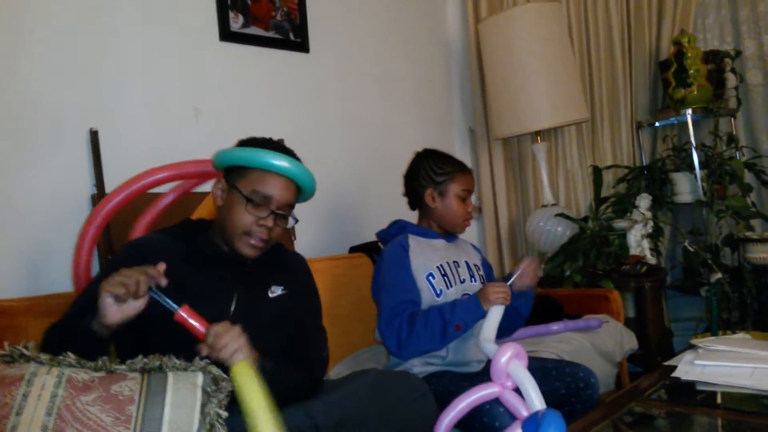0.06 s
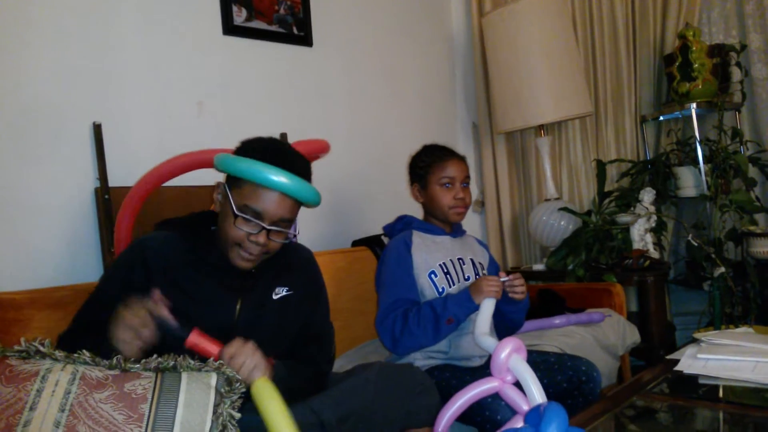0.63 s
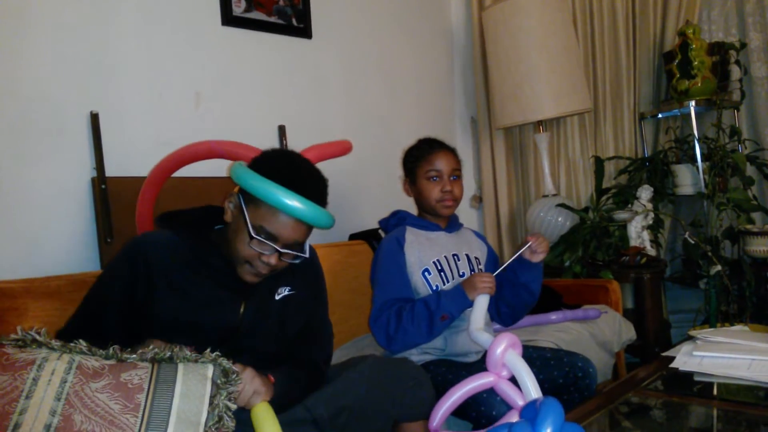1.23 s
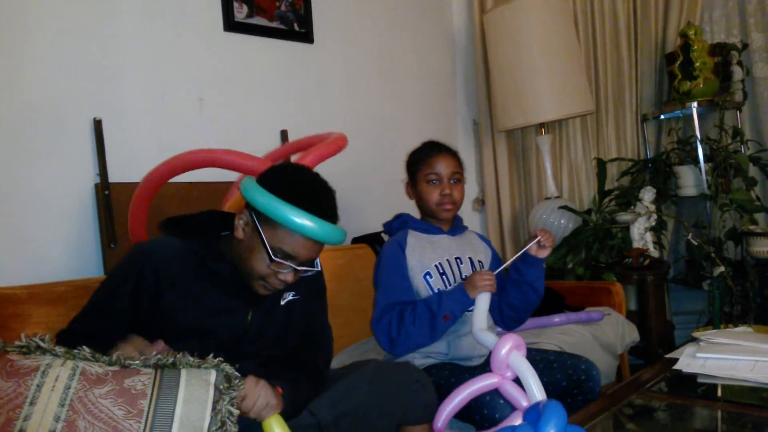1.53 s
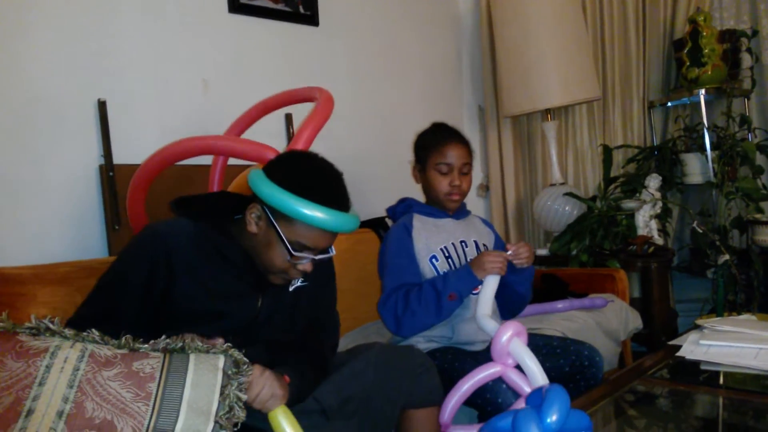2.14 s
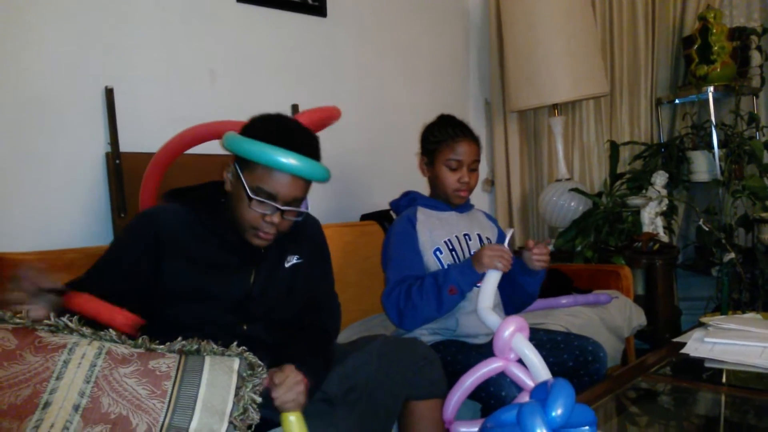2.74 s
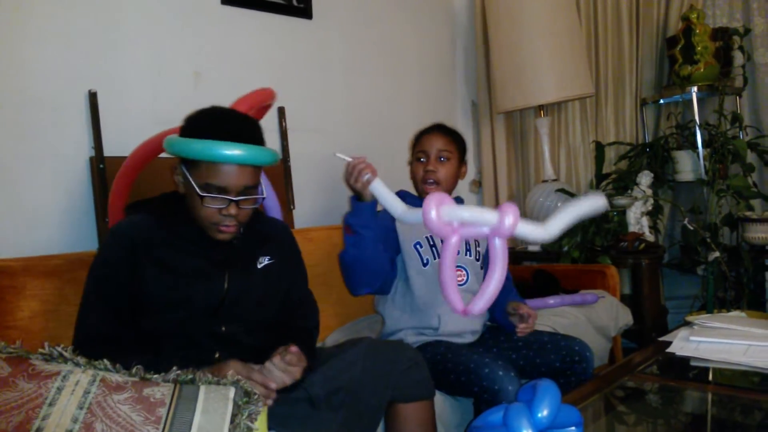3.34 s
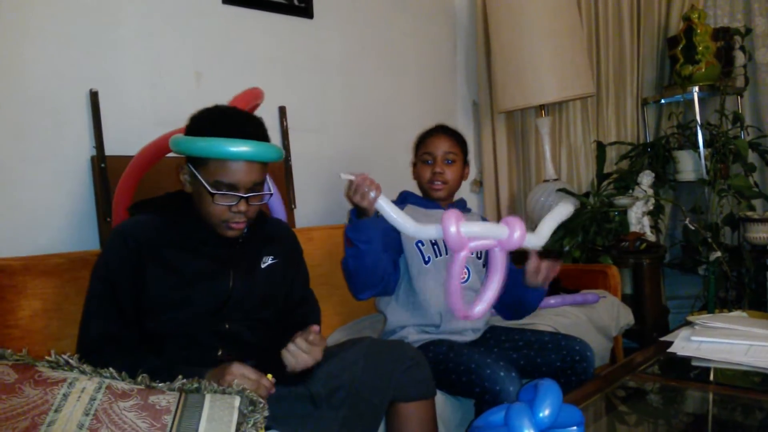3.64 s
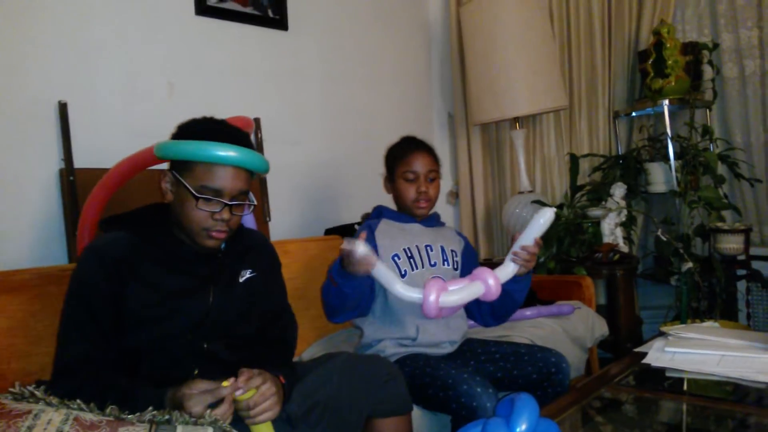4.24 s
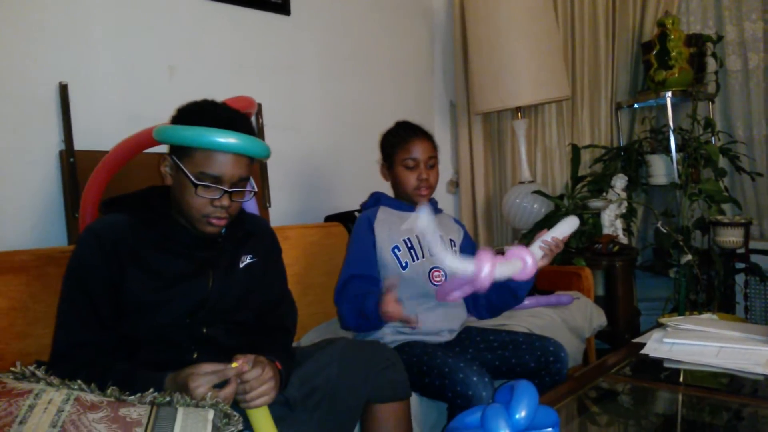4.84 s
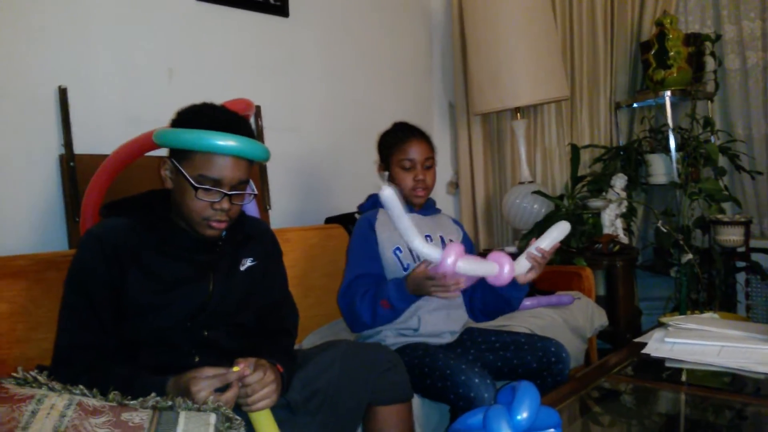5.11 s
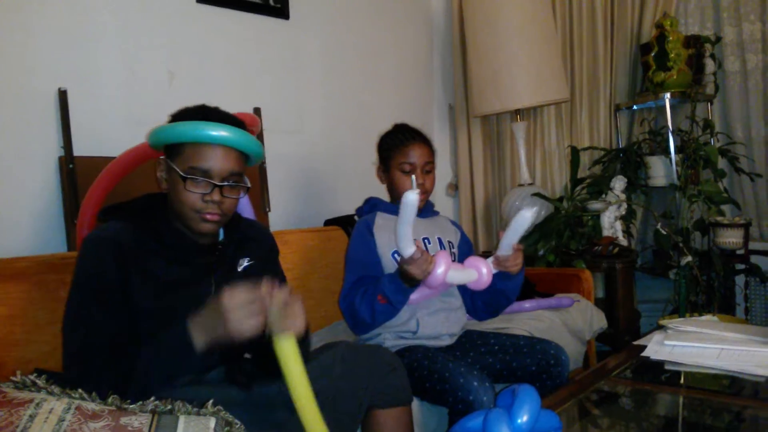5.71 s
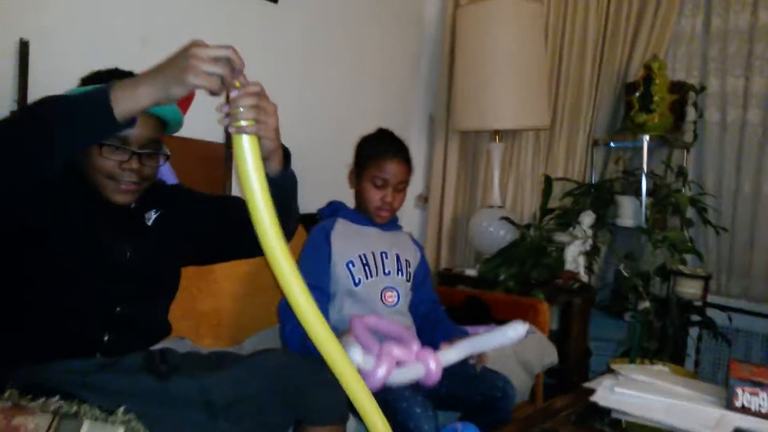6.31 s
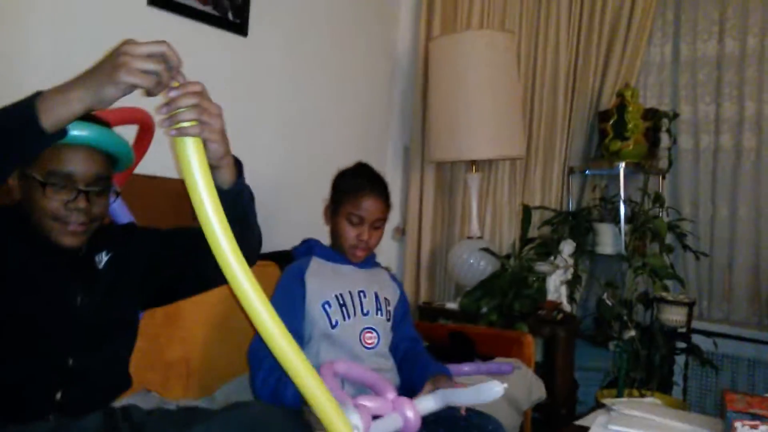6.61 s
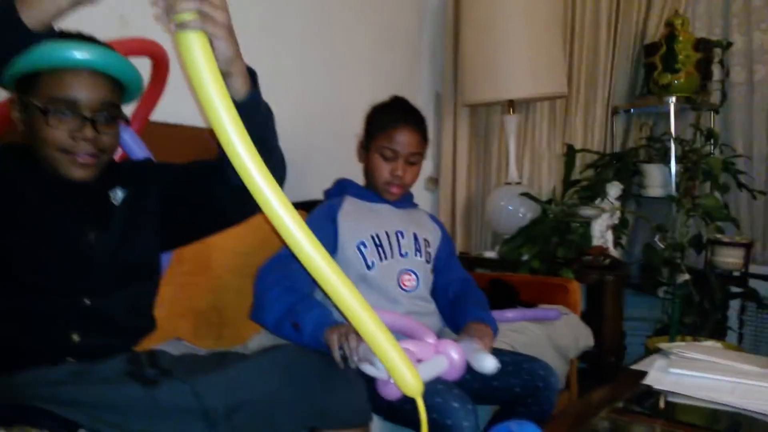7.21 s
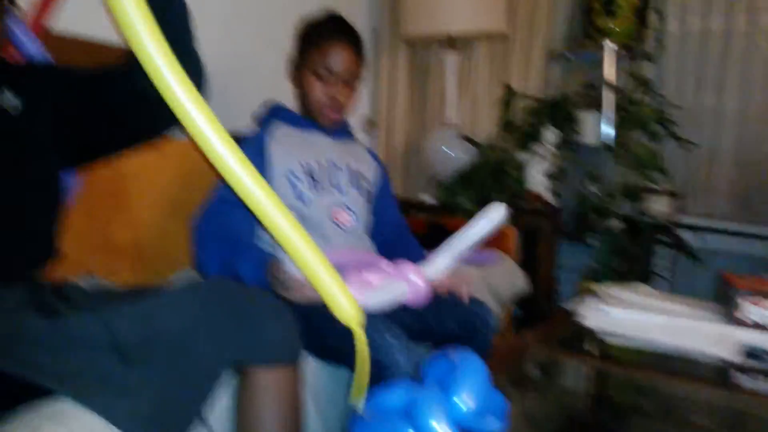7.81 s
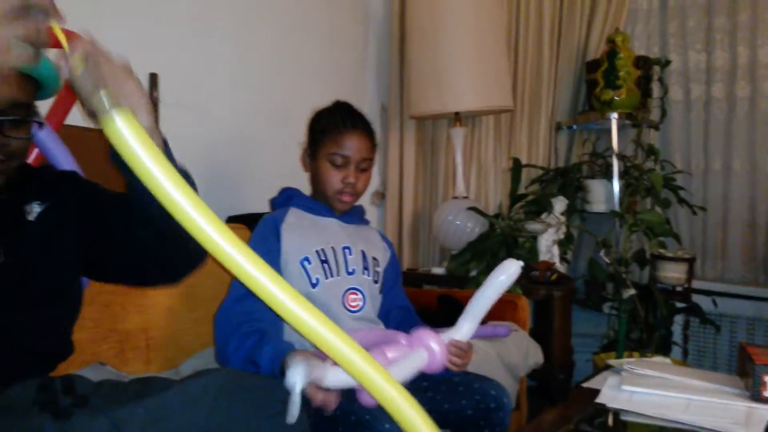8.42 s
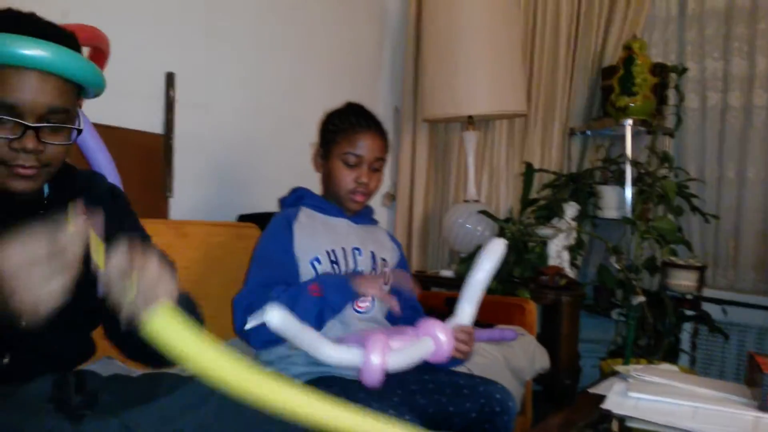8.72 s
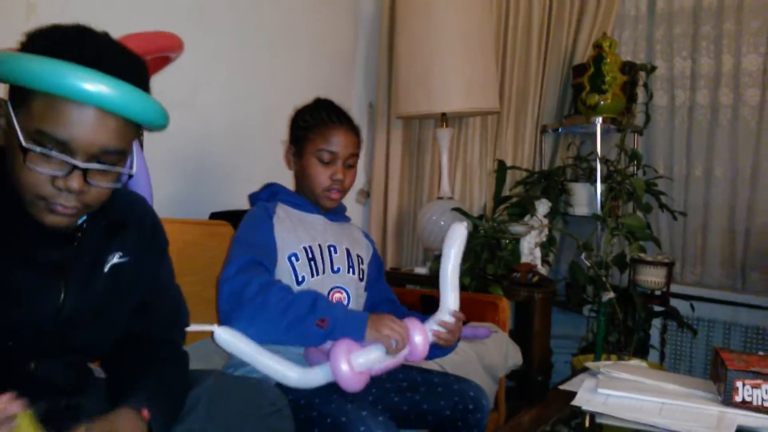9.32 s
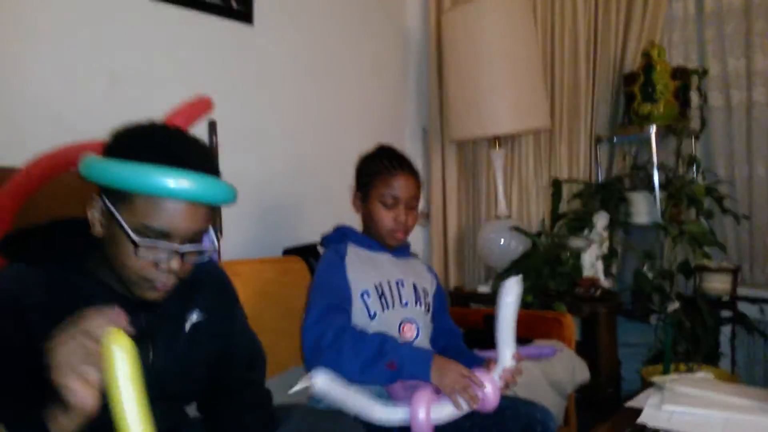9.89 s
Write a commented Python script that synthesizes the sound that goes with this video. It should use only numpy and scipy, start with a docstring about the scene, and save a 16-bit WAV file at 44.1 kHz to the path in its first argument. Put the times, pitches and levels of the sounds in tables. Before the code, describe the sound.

Quick whistling pump strokes inflate a long balloon, followed by leaking air and the scrapes, creaks and snaps of latex being tied.

```python
"""A long latex balloon is filled by a hand pump, let down a little and knotted, in a living room.
Each pump stroke hisses through a whistling valve, the seal squeaks and the piston clacks.
The balloon pops off the nozzle and is bumped, and air rushes, then seeps, through its neck.
Fingers stretch, twist and knot the rubber, which sticks and slips: it scrapes, snaps and briefly sings.
Behind it, cloth rustles on a sofa and the pump thuds against the sofa's arm."""
import sys
import numpy as np
from scipy import signal
from scipy.fft import rfft, irfft, next_fast_len
from scipy.io import wavfile
from scipy.ndimage import uniform_filter1d, map_coordinates

SR = 44100
rng = np.random.default_rng(int(sys.argv[2]) if len(sys.argv) > 2 else 0)


def dump(signal):
    """Clip the signal to [-1, 1] and save it as 16-bit WAV at the path in sys.argv[1]."""
    limited = np.clip(np.atleast_2d(signal).T, -1, 1)
    pcm = np.round(limited * 32767).astype(np.int16)
    wavfile.write(sys.argv[1], SR, pcm)


N = 438794
TIME = np.arange(N) / SR
FFT_SIZE = next_fast_len(N + SR, True) // 2 * 2
HZ = np.maximum(np.arange(FFT_SIZE // 2 + 1) * SR / FFT_SIZE, 1)

# Whistles of air forced through the balloon's neck: pitch_hz, level_db
NECK_WHISTLES = [(6330, -5), (7050, -5), (7500, -1), (7900, -8)]
# Air rushing from the open neck: time_s, level_db, whistle_boost_db
NECK_AIRFLOW = [(2.674, -84, -3), (2.685, -44, 11), (2.69, -24, 7.5), (2.722, -25.5, 2), (2.81, -38, 0.5),
                (3.098, -47, 3.5), (3.33, -35, 7), (3.434, -37, 6), (3.49, -34, 9.5), (3.6, -32, 10),
                (3.668, -30, 5), (3.738, -68, 8), (3.744, -76, 19), (3.77, -74, 3)]
# Hard rubs on the rubber, and at 2.69 s the neck fluttering as it comes off the nozzle: start_s, swell_s,
# fade_s, level_db, ring_hz, treble_db, slips_per_s, unevenness (0 to 1), low_cut_hz
HARD_RUBS = [(2.69, 0.0011, .0039, -19.5, 1900, 2, 1060, 0.55, 400),
             (2.848, .0036, .019, -45, 3080, 11, 630, 0.92, 400),
             (3.192, .003, .011, -33, 1450, 11, 376, 0.74, 400),
             (3.252, 0.0034, 0.029, -24.5, 970, 1.5, 535, 0.69, 150),
             (4.17, 0.039, .055, -39.5, 1620, 0.5, 850, 0.69, 300),
             (4.48, 0.016, 0.024, -40.5, 1140, -13, 700, 0.54, 400),
             (4.629, 0.046, 0.064, -29.5, 2860, -3.5, 570, 0.69, 250),
             (4.786, .008, 0.032, -35, 2210, -1, 630, 0.71, 400),
             (5.015, 0.027, 0.024, -37.5, 1810, 6, 1100, .8, 690),
             (5.15, 0.042, 0.075, -36.5, 2320, -6, 600, 0.77, 300),
             (5.83, 0.023, .05, -37.5, 6040, 4, 850, 0.61, 700),
             (5.89, 0.043, 0.046, -26, 5400, 5, 590, 0.39, 900),
             (5.94, 0.016, .025, -25, 2400, -2, 410, .15, 600),
             (5.97, 0.029, 0.013, -28, 2200, 3.5, 450, 0.05, 350),
             (6.015, 0.013, 0.021, -19, 3900, -4, 490, .1, 900),
             (6.616, 0.0059, 0.044, -30.5, 8400, 5, 1000, 0.69, 1500),
             (6.635, 0.022, 0.021, -24.5, 3700, -11, 450, .2, 300),
             (6.716, 0.032, 0.027, -27.5, 2400, 0, 640, 0.27, 300),
             (6.79, .02, 0.013, -33.5, 750, -17, 400, .3, 300),
             (6.89, .014, 0.033, -26, 1420, -1, 1240, 0.24, 1150),
             (6.965, 0.025, .014, -29, 1120, -7, 750, .3, 650),
             (7.12, 0.024, 0.054, -35.5, 2100, 3.5, 650, 0.56, 400),
             (7.493, .003, 0.026, -22.5, 4380, -14, 200, 0.34, 3000),
             (7.581, 0.0034, 0.019, -23.5, 2120, -1.5, 440, .2, 500),
             (7.648, 0.0052, .014, -27.5, 4130, -5, 520, 0.31, 400),
             (7.706, 0.031, .022, -27, 3360, 4, 380, 0.07, 350),
             (7.812, 0.013, 0.02, -20.5, 6000, -1, 440, 0.11, 350),
             (7.893, 0.006, 0.034, -19, 2540, 0, 370, .08, 300),
             (7.894, 0.0095, 0.016, -18.5, 5600, -0.5, 390, 0.07, 1500),
             (8.905, .012, 0.048, -32.5, 990, 3.5, 660, .7, 350),
             (8.95, 0.059, 0.041, -31.5, 1800, -7, 650, .5, 300),
             (9.085, 0.062, 0.038, -26, 1430, 0.5, 470, 0.28, 300),
             (9.345, 0.015, 0.048, -28, 3950, 3, 870, 0.47, 2200),
             (9.452, 0.0033, 0.011, -21.5, 3930, -1, 1240, 0.58, 1200),
             (9.54, 0.013, .014, -34.5, 4130, 1, 630, 0.6, 800)]


def from_db(db):
    """Turn decibels into a number to multiply by."""
    return 10 ** (np.asarray(db) / 20)


def rms_one(x):
    """Scale a signal to an average power of 1."""
    return x / np.sqrt(np.mean(x ** 2) + 1e-20)


def at_hz(points):
    """Spread a short table of (pitch_hz, value) over all frequencies."""
    hz, value = np.transpose(points)
    return np.interp(np.log(HZ), np.log(hz), value)


def gains(rows):
    """One gain curve for each decibel column of a timed table, silent outside its span."""
    times, *columns = np.transpose(rows)
    inside = (TIME >= times[0]) & (TIME <= times[-1])
    return [from_db(np.interp(TIME, times, db)) * inside for db in columns]


def drift(per_s):
    """A random wander of about plus or minus 1, with per_s new values a second."""
    points = rng.standard_normal(8000)
    return rms_one(np.interp(TIME * per_s, np.arange(len(points)), points))


def colour(x, spectrum):
    """Filter to a tone colour, keeping the power of white noise."""
    cepstrum = irfft(np.log(rms_one(from_db(at_hz(spectrum)))))
    # Folding it makes the filter ring only after a sound, never before.
    cepstrum[1:FFT_SIZE // 2] *= 2
    cepstrum[FFT_SIZE // 2 + 1:] = 0
    return irfft(rfft(x, FFT_SIZE) * np.exp(rfft(cepstrum)))[..., :N]


def high_pass(x, hz, order):
    """Weaken everything below hz."""
    return signal.sosfilt(signal.butter(order, hz, "high", fs=SR, output="sos"), x + 1e-18)


def resonate(x, hz, q):
    """Ring at one pitch, keeping the power of white noise; a higher q rings longer."""
    decay, angle = np.exp(-np.pi * hz / (q * SR)), 2 * np.pi * hz / SR
    feed = np.sqrt((1 - decay ** 2) / 2) * np.array([1, 0, -1])
    return signal.lfilter(feed, [1, -2 * decay * np.cos(angle), decay ** 2], x + 1e-18)


def diffuse(pair):
    """Blend two unrelated signals into left and right, alike in the bass."""
    # How alike the two sides are: pitch_hz, likeness (0 to 1)
    likeness = [(30, 0.7), (120, 0.85), (300, 0.8), (650, 0.66), (1400, 0.1), (4000, 0.1), (14000, 0)]
    alike = at_hz(likeness)
    mid, side = rfft(pair, FFT_SIZE)
    return irfft(np.sqrt((1 + alike) / 2) * mid + np.sqrt((1 - alike) / 2) * side * [[1], [-1]])[:, :N]


def noise():
    """White stereo noise."""
    return diffuse(rng.standard_normal((2, N)))


def clicks_at(rows):
    """One click for each row of (start_s, level_db)."""
    out = np.zeros(N)
    for start_s, db in rows:
        out[int(start_s * SR)] += from_db(db)
    return out


def fading(clicks, fade_s):
    """Give each click a fading level curve of the same energy."""
    decay = np.exp(-2 / (fade_s * SR))
    return np.sqrt(signal.lfilter([1 - decay], [1, -decay], clicks ** 2 + 1e-18))


def noise_bursts(clicks, fade_s):
    """Each click leaves a short burst of noise, like many crowded tones dying away."""
    return fading(clicks, fade_s) * noise()


def swell_and_fade(t, swell_s, fade_from_s, fade_s):
    """A level that rises in a straight line, holds, then dies away."""
    return np.clip(t / swell_s, 0, 1) * np.exp(-np.clip((t - fade_from_s) / fade_s, 0, 50))


def slips(per_s, uneven, spread_db, count=N):
    """Sticking and slipping: a train of clicks with uneven gaps and strengths."""
    gap_luck, size_luck = rng.standard_normal((count // 20, 2)).T
    at = np.cumsum(SR / per_s * np.exp(uneven * gap_luck)).astype(int)
    out = np.zeros(count)
    out[at[at < count]] = from_db(spread_db * np.clip(size_luck[at < count], -2, 2))
    return rms_one(out)


def squeaks(rows, waver, rough_db, even_db):
    """Short gliding tones of rubber slipping almost regularly; even_db weakens the even overtones."""
    out = np.zeros(N)
    wobble = 1 + waver * drift(250)
    grip = from_db(rough_db * np.tanh(drift(300)))
    for middle_s, hz, db, half_s, glide, overtone_db in rows:
        near = np.abs(TIME - middle_s) < 3 * half_s
        t = TIME[near] - middle_s
        phase = 2 * np.pi * np.cumsum(hz * 2 ** (glide * t) * wobble[near]) / SR
        tone = np.sin(phase)
        for k in range(2, 7):
            tone += from_db(overtone_db + even_db * (k % 2 == 0)) * np.sin(k * phase) * 2 / k
        out[near] += np.sqrt(2) * from_db(db) * np.exp(-(t / half_s) ** 2) * tone
    return out * grip


def room_tone():
    """The faint, steady rumble and hiss of a quiet room."""
    # Its tone colour: pitch_hz, level_db
    room_colour = [(15, -56), (25, 0), (54, -14), (157, -41.5), (679, -19), (1970, -9), (2500, -6.5),
                   (5410, -5.5), (7450, -4.5), (9730, -9), (14500, -13)]
    return from_db(-51.5) * colour(noise(), room_colour)


def room_echo(x, ring_s=0.2, delay_s=.004):
    """Crowded reflections of a furnished room, falling 60 dB in ring_s."""
    t = TIME[:SR // 2]
    tail = rng.standard_normal((2, len(t))) * from_db(-60 * t / ring_s) * (t > delay_s)
    tail /= np.sqrt(np.sum(tail ** 2, axis=1, keepdims=True))
    return diffuse(signal.fftconvolve(x, tail, axes=1)[:, :N])


def cloth_rustle():
    """Cloth rustles in soft lumps as people move on a sofa."""
    # How much they move: time_s, level_db
    movement = [(0.0, -58.5), (1.3, -66), (2.19, -63), (2.8, -73.5), (3.21, -50.5), (3.45, -40),
                (3.62, -72.5), (4.2, -60), (4.75, -82), (5.25, -65), (5.65, -69.5), (6.45, -63),
                (6.78, -53.5), (7.3, -61.5), (7.85, -56), (8.5, -61), (9.15, -45), (9.4, -56.5),
                (9.95, -59.5)]
    # Tone colour of cloth: pitch_hz, level_db
    cloth_colour = [(30, -33), (60, -20), (100, -3), (160, -1), (240, -1.5), (400, -4), (800, -7),
                    (2000, -39)]
    lumps = from_db(4.5 + 5 * np.tanh(drift(22)))
    return gains(movement)[0] * lumps * colour(noise(), cloth_colour)


def sofa_thuds():
    """The pump knocks on the sofa's padded arm, which rings low and dull."""
    # The knocks: start_s, level_db
    knocks = [(1.204, -42), (1.262, -41), (1.444, -46), (1.678, -28.5), (1.697, -35), (1.725, -41)]
    # Tones the arm rings with: pitch_hz, level_db, ring_s (time to fall 60 dB)
    sofa_tones = [(109, -11, 0.21), (146, -2.5, 0.13), (175, -4.5, .11), (290, -3, 0.071)]
    out, t = np.zeros(N), TIME[:SR // 3]
    soft_start = np.minimum(t / .004, 1)
    for start_s, db in knocks:
        at = int(start_s * SR)
        for hz, tone_db, ring_s in sofa_tones:
            level = soft_start * from_db(db + tone_db - 60 * t / ring_s)
            out[at:at + len(t)] += level * np.sin(2 * np.pi * (hz * t + rng.random()))
    return out


def strokes(rows, blur_hz=370, sag_octaves=0.053):
    """The air flow of pump strokes, and the valve's breathy whistle, which sags as the flow dies."""
    flow, whistle = np.zeros(N), np.zeros((2, N))
    slow = signal.butter(2, blur_hz, fs=SR, output="sos")
    breath = rms_one(signal.sosfilt(slow, rng.standard_normal((2, 2, N))))
    for middle_s, half_s, db, hz in rows:
        near = np.abs(TIME - middle_s) < 3 * half_s
        t = TIME[near] - middle_s
        width_s = half_s * (1 + 0.073 * np.sign(t))   # builds up faster than it dies
        effort = np.exp(-np.abs(t / width_s) ** 2.4)   # a slightly square bell curve
        phase = 2 * np.pi * np.cumsum(hz * 2 ** (sag_octaves * (effort - 1))) / SR
        tone = breath[0][:, near] * np.cos(phase) + breath[1][:, near] * np.sin(phase)
        flow[near] += from_db(db) * effort
        whistle[:, near] += from_db(db - 2) * effort * tone
    return flow, whistle


def pump_air():
    """Air hisses and whistles through valve and neck; the fluttering flap makes each push rasp."""
    # Pushes, about four a second: middle_s, half_length_s, level_db, whistle_hz
    pushes = [(.025, 0.033, -31.5, 6930), (.287, 0.039, -32, 6770), (.56, 0.037, -30, 7500),
              (.808, 0.038, -32, 7400), (1.067, 0.038, -34, 7300), (1.306, 0.035, -30, 7630),
              (1.539, 0.048, -33, 6900), (1.783, 0.036, -33.5, 6950), (2.016, 0.034, -33.5, 6570),
              (2.243, 0.028, -32.5, 6980)]
    # Softer pulls in between: middle_s, half_length_s, level_db, whistle_hz
    pulls = [(.18, 0.066, -47.5, 7300), (.428, 0.041, -34.5, 7400), (.678, 0.043, -33, 7250),
             (.928, 0.035, -34, 7270), (1.185, 0.046, -35, 7400), (1.42, 0.045, -35.5, 7130),
             (1.662, 0.044, -34, 7100), (1.912, 0.036, -35.5, 7150), (2.143, 0.041, -36.5, 7300),
             (2.43, 0.051, -42, 7420)]
    # Tone colour of the valve's hiss: pitch_hz, level_db
    valve_colour = [(60, -23), (200, -33), (500, -20), (900, -13.5), (1800, -17.5), (3000, -7), (4000, -9),
                    (5200, -6.5), (6300, -0.5), (7400, 1.5), (8500, -5), (10000, -8.5), (11500, -7),
                    (14500, -13)]
    # Tone colour of the fine spray of air on a push: pitch_hz, level_db
    spray_colour = [(3000, -30), (8500, -20), (11300, 1), (14500, -2)]
    push, push_whistle = strokes(pushes)
    pull, pull_whistle = strokes(pulls)
    flutter = fading(slips(per_s=260, uneven=.4, spread_db=3), fade_s=.0008)
    stream = push * (from_db(-4) + from_db(-8) * flutter) + pull
    hiss = colour(stream * from_db(0.5 + 0.94 * drift(400)) * noise(), valve_colour)
    neck = sum(resonate((push + pull) * from_db(db - 5 + 2 * drift(11)) * noise(), hz, q=25)
               for hz, db in NECK_WHISTLES)
    spray = colour(from_db(-3.5) * push * noise(), spray_colour)
    return hiss + spray + push_whistle + pull_whistle + neck


def valve_ticks():
    """The valve's flap ticks with a short, high ring."""
    # The ticks: start_s, level_db
    ticks = [(0.2885, -27), (0.776, -21), (0.786, -7.5), (0.7954, -13), (0.8084, -11), (1.045, -8),
             (1.067, -11), (1.3593, -16.5), (1.5606, -12.5)]
    return from_db(13) * resonate(noise_bursts(clicks_at(ticks), fade_s=0.0038), hz=7360, q=20)


def piston_seal():
    """The seal breaks loose with a dull tick and squeaks as it slides; uneven grip adds a rasp."""
    # Squeaks: middle_s, pitch_hz, level_db, half_length_s, glide_octaves_per_s, overtones_db
    chirps = [(.095, 950, -38.5, 0.021, 15.5, -10), (.345, 295, -46, 0.029, -1, -8.5),
              (.422, 960, -45.5, 0.021, 21, 0), (.507, 1313, -48, .01, -24.5, 0),
              (.617, 1084, -47, 0.0066, 25, -3), (.762, 1390, -49, 0.0082, 19, -12),
              (.925, 1067, -49, 0.026, 20.5, -12), (1.095, 730, -52, 0.024, -8, -17),
              (1.125, 1033, -47, .006, 26, -14), (1.162, 905, -50, 0.012, 19, -6),
              (1.37, 803, -46.5, .016, 19, -4), (1.635, 698, -43.5, 0.018, 13.5, -15),
              (1.89, 785, -47.5, 0.031, 13.5, -6), (2.11, 763, -47, 0.026, 12.5, -5),
              (2.365, 748, -53, 0.014, 6.5, -4)]
    # The seal breaking loose: start_s, level_db
    releases = [(.612, -32), (.9, -28), (1.122, -29), (1.871, -25), (2.095, -27), (2.356, -31.5)]
    tone = squeaks(chirps, waver=.09, rough_db=4, even_db=-4)
    rasp = from_db(-2.5)
    squeak = tone * (1 + rasp * drift(450)) / np.hypot(1, rasp)
    tick = resonate(noise_bursts(clicks_at(releases), fade_s=.003), hz=780, q=2.5)
    return from_db(-1) * squeak + from_db(7) * tick


def piston_clacks(rebound_s=0.016, turn_s=.057):
    """The piston hits its stop, rebounds and rattles, ringing the barrel at a new pitch each time."""
    # The hits: start_s, level_db, ring_hz
    hits = [(0.4517, -14.5, 5360), (0.6948, -13, 6940), (0.9495, -14, 6500), (1.199, -12.5, 5630),
            (1.44, -11.5, 7400), (1.691, -15, 7500)]
    # Tone colour of the pump's barrel: pitch_hz, level_db
    barrel_colour = [(60, -12), (200, -9.5), (900, -8), (2200, -4.5), (3500, 0), (5500, 6), (7300, 9),
                     (9000, -7), (14500, -27)]
    out, t = np.zeros((2, N)), TIME[:SR // 8]
    impact = from_db(3.5) * np.exp(-t / 0.0021)
    rattle = from_db(-8) * np.exp(-t / 0.023)
    rebound = from_db(-9) * np.exp(-((t - rebound_s) / 0.0039) ** 2)
    force = impact + rattle + rebound
    force += from_db(-12) * np.interp(t - turn_s, t, force, left=0)   # a light knock as the hand turns
    for start_s, db, hz in hits:
        at = int(start_s * SR)
        hit = from_db(db) * force * rng.standard_normal((2, len(t)))
        out[:, at:at + len(t)] += from_db(-7) * hit + from_db(-20) * resonate(hit, hz, q=7.7)
    return colour(out, barrel_colour)


def neck_pop(start_s=2.691):
    """A short puff rings the neck as it comes free of the nozzle."""
    puff = swell_and_fade(TIME - start_s, swell_s=0.0024, fade_from_s=0.0023, fade_s=0.013)
    return resonate(from_db(-27) * puff * noise(), hz=750, q=8.1)


def neck_echo(x, notch_spacing_hz=1050, echo_share=0.39):
    """A dull, upside-down echo from the neck's end hollows the sound; the neck's length wavers."""
    lag = SR / notch_spacing_hz * (1 + .04 * drift(8))
    dull = signal.sosfiltfilt(signal.butter(2, 3800, fs=SR, output="sos"), x + 1e-18)
    at = np.arange(N)
    return x - echo_share * np.array([np.interp(at - lag, at, side) for side in dull])


def escaping_air():
    """Air rushing from the open neck roars and whistles."""
    # Tone colour of the jet: pitch_hz, level_db
    jet_colour = [(1200, -54), (2500, -10.5), (3400, -14.5), (4000, -8.5), (5500, -2), (6300, 0.5),
                  (8000, -1.5), (9700, -7.5), (11800, -7), (14000, -5), (14600, -12.5)]
    # Tone colour of the lower rush: pitch_hz, level_db
    rush_colour = [(60, -43), (300, -30), (700, -51), (1100, -5), (2200, 6), (3500, -7), (6000, -11)]
    flow, whistle_boost = gains(NECK_AIRFLOW)
    drive = flow * whistle_boost ** 1.36
    whistle = sum(resonate(drive * from_db(db - 3 + 2.7 * drift(13)) * noise(), hz, q=35)
                  for hz, db in NECK_WHISTLES)
    jet = colour(flow * from_db(9.5 + 0.91 * drift(200)) * noise(), jet_colour)
    rush = from_db(-9.5) * colour(flow * noise(), rush_colour)
    return neck_echo(jet + rush) + whistle


def seeping_air():
    """Pinched to a slit, the neck gives a thin, high hiss."""
    # A short leak and a long one, each a list of: time_s, level_db
    leaks = [
        [(4.425, -61), (4.437, -31), (4.46, -28.5), (4.5, -45), (4.56, -74)],
        [(4.605, -62), (4.622, -33.5), (5.0, -33.5), (5.25, -34.5), (5.4, -38), (5.53, -45.5), (5.7, -38.5),
         (5.88, -43), (6.1, -50), (6.6, -49)],
    ]
    # Tone colour of the slit: pitch_hz, level_db
    slit_colour = [(1000, -65), (4000, -17.5), (6000, -6), (7500, 1), (9500, -6), (11500, -5.5), (13000, 4),
                   (14500, -0.5)]
    flow = sum(gains(leak)[0] for leak in leaks)
    return colour(flow * from_db(4.5 + 0.99 * drift(66)) * noise(), slit_colour)


def air_column(clamp_s=3.655):
    """The flow rings the air inside the neck, hardest as the fingers clamp it shut."""
    # Tones of that air: pitch_hz, level_db
    column_tones = [(1510, -12.5), (1900, -15), (2540, -12), (2840, -6), (3330, -15), (3980, -0.5),
                    (5000, -0.5), (5510, -12)]
    flow = gains(NECK_AIRFLOW)[0]
    stream = from_db(-44) * (flow / from_db(-31.5)) ** 0.39   # swings less than the flow does
    clamp = from_db(-26) * swell_and_fade(TIME - clamp_s, 0.0024, fade_from_s=0.011, fade_s=0.0091)
    return sum(resonate((stream + clamp) * from_db(db) * rng.standard_normal((2, N)), hz, q=24)
               for hz, db in column_tones)


def balloon_bumps():
    """Blows ring the balloon: a soft one stirs its low tones, a sharp slap mostly the higher ones."""
    # The blows: start_s, level_db, brightness_hz
    blows = [(2.613, -19, 202), (2.883, -24, 200), (3.093, -21, 230), (3.192, -31.5, 900),
             (3.253, -9, 1240), (3.266, -14.5, 1400), (3.285, -17, 1800), (3.394, -5.5, 300),
             (3.464, -13, 510), (8.192, -25.5, 400), (8.653, -10, 358), (8.702, -16, 220), (8.72, -24, 200),
             (8.878, -32.5, 700), (9.16, -18.5, 400), (9.667, -23.5, 290)]
    # Tones the balloon rings with: pitch_hz, level_db, ring_s (time to fall 60 dB)
    balloon_tones = [(155.6, -17, 0.093), (207, -9, 0.059), (263, -13, 0.1), (340, -9.5, 0.078),
                     (423, -3, 0.052), (460, -4.5, 0.031), (601, -1.5, 0.036), (839, -5, 0.058),
                     (916, -2.5, .06), (1040, -4, 0.071), (1730, -2, 0.036)]
    out, t = np.zeros(N), TIME[:SR // 4]
    for start_s, db, bright_hz in blows:
        at = int(start_s * SR)
        for hz, tone_db, ring_s in balloon_tones:
            # Where the blow lands changes each tone's share; the grip changes its tuning.
            place_db, tuning, sign = rng.normal(0, 1.5), rng.normal(1, .015), rng.choice([-1, 1])
            strength = sign * from_db(db + tone_db + place_db)
            strength /= (1 + (hz / bright_hz) ** 2) ** 1.34   # weakens tones above the brightness
            strength /= 1 + (0.14 * bright_hz / hz) ** 2   # and those far below it
            ring = from_db(-60 * t / ring_s) * np.sin(2 * np.pi * hz * tuning * t)
            out[at:at + len(t)] += strength * ring
    return high_pass(out, hz=135, order=4)   # a slim tube gives off no deep bass


def finger_pressure(spread_s=0.13):
    """How hard the rubber is pressed and shaken: a slow base, rising around every hard rub and the neck's
    flutter."""
    # Two spells of light touch, each a list of: time_s, level_db
    touches = [
        [(3.8, -73), (3.982, -54.5), (4.142, -47), (4.292, -55), (4.47, -45.5), (4.6, -79)],
        [(5.55, -57), (5.65, -50.5), (6.01, -33), (6.33, -49.5), (6.61, -48), (6.81, -42.5), (7.28, -56),
         (7.47, -44.5), (7.63, -38), (7.83, -40), (8.0, -48.5), (8.93, -45.5), (9.08, -39), (9.95, -41.5)],
    ]
    effort, t = np.zeros(N + SR), TIME[:SR // 2]
    for start_s, swell_s, fade_s, db, *_ in HARD_RUBS:
        at = int(start_s * SR)
        effort[at:at + len(t)] += from_db(db) * swell_and_fade(t, swell_s, swell_s, fade_s)
    around_rubs = uniform_filter1d(effort[:N], int(spread_s * SR))
    base = sum(gains(spell)[0] for spell in touches)
    return np.hypot(from_db(-1.5) * base, from_db(-10) * around_rubs)


def finger_slides():
    """Fingers sliding lightly over the rubber make a fine, wandering crackle."""
    # Its tone colour: pitch_hz, level_db
    finger_colour = [(60, -49), (200, -24), (420, -9.5), (700, -9.5), (1500, -7), (3000, -7), (3900, -7),
                     (5100, -8.5), (7200, -2), (9500, -10.5), (14500, -14.5)]
    pressure = finger_pressure() * from_db(2 * drift(35))
    clicks = pressure * slips(per_s=900, uneven=0.98, spread_db=2.5)
    return from_db(5.5) * colour(noise_bursts(clicks, fade_s=.0022), finger_colour)


def balloon_hoots():
    """The air in the balloon sings along with the slipping rubber."""
    # Hoots: middle_s, pitch_hz, level_db, half_length_s, glide_octaves_per_s, overtones_db
    hoots = [(6.007, 429, -21, .024, 0, -11.5), (6.665, 429.6, -38, .022, 3.5, -2),
             (6.775, 399, -45, .022, -2.5, 1), (7.52, 432, -41, .022, -1.5, -3),
             (7.745, 416, -47, .02, -1, 4), (7.842, 426, -33, .022, 0, -7),
             (7.922, 413, -32.5, .022, 2, -5), (9.152, 432, -28, .018, -6, -13)]
    return squeaks(hoots, waver=0.01, rough_db=2, even_db=-7.5)


def rubber_snaps():
    """Stretched rubber leaves a fingertip with a crack and a flutter, then crackles as it settles."""
    # The snaps: start_s, level_db, left_minus_right_db
    snaps = [(2.61, -18.5, 6), (3.9343, -16, -3.5), (4.6673, -25, 7), (4.7498, -23, 0), (4.7887, -20, 2),
             (4.799, -23, 0), (5.185, -23, 4), (5.946, -14, 7), (6.1945, -22.5, 8), (6.305, -14, -2),
             (6.537, -27, 4), (6.617, -22, -15), (6.721, -24, -3), (6.737, -11, 2), (6.78, -18, 2),
             (6.7827, -7.5, 3), (6.8846, -23, 7), (7.1432, -19.5, -1), (7.174, -11, 3), (7.186, -18, -11),
             (7.4455, -18, 2), (7.4971, -17, 4), (7.5043, -15.5, 1), (7.5835, -18, 3), (7.8072, -8, 3),
             (7.8143, -15, -1), (7.87, -15, 2), (7.8842, -7.5, 0), (8.1826, -24, -4), (8.187, -18, 4),
             (8.2678, -21.5, 1), (8.2948, -19.5, 4), (8.3292, -19, -2), (8.3453, -16, .5), (8.36, -26, 2),
             (8.3789, -16.5, 4), (8.384, -20, -1), (8.518, -11.5, 5), (8.534, -24, -4), (8.548, -22, 1),
             (8.6513, -17.5, -4.5), (9.29, -18.5, 5), (9.7104, -21.5, 11), (9.7464, -15, 4),
             (9.7738, -16.5, 3), (9.863, -10, 0.5), (9.945, -15.5, 7)]
    # Their tone colour: pitch_hz, level_db
    snap_colour = [(60, -60), (300, -10), (1200, -6.5), (3000, -6), (4500, -2), (5500, -3), (6500, -0.5),
                   (7800, 4), (9500, -11.5), (14500, -11.5)]
    cracks = np.array([clicks_at([(s + 0.0005, db + side * pan_db / 2) for s, db, pan_db in snaps])
                       for side in (1, -1)])
    flutter = noise_bursts(cracks, fade_s=.001)
    settling = from_db(-3.5) * fading(cracks, fade_s=0.024)
    crackle = noise_bursts(settling * slips(per_s=400, uneven=.9, spread_db=-0.5), fade_s=.0005)
    return colour(from_db(-17) * cracks + from_db(13) * (flutter + crackle), snap_colour)


def skin_ring(fade_s):
    """Waves running to and fro on the balloon's skin: a short ring, new with every grip."""
    spectrum = rfft(rng.standard_normal((2, SR // 50)) * np.exp(-TIME[:SR // 50] / fade_s))
    ring = irfft(spectrum / np.sqrt(np.abs(spectrum)))[:, :SR // 100]   # softens the sharpest tones
    return ring / np.sqrt(np.sum(ring ** 2, axis=1, keepdims=True))


def rubber_rubs(ring_s=.0013):
    """Fingers drag the tight skin, and the freed neck flutters: even slips repeat one ring and creak, uneven
    ones scrape."""
    # Tone colour of latex: pitch_hz, level_db
    latex_colour = [(71, -43), (120, -65), (321, -11.5), (425, -6), (551, -9), (760, -9), (1530, -10.5),
                    (2290, -9), (3090, -10), (4270, -5.5), (5540, -10), (6630, -4.5), (9900, -14),
                    (14500, -23)]
    out, count = np.zeros((2, N)), SR // 3
    t, hiss = TIME[:count], noise()
    tension = 1 + .025 * np.tanh(drift(40))   # the pull bends slip rate and pitch together
    for start_s, swell_s, fade_s, db, ring_hz, treble_db, per_s, uneven, low_cut_hz in HARD_RUBS:
        at = int(start_s * SR)
        span = slice(at, at + count)
        clicks = slips(per_s, uneven, spread_db=2.8, count=count)
        creak = signal.fftconvolve(clicks[None], skin_ring(ring_s), axes=1)[:, :count]
        creak = np.array([map_coordinates(side, [np.cumsum(tension[span])]) for side in creak])
        scrape = fading(clicks, ring_s / 2) * hiss[:, span]
        rub = np.sqrt(1 - uneven ** 2) * creak + uneven * scrape + from_db(-10.5) * clicks
        rub *= from_db(db) * swell_and_fade(t, swell_s, swell_s, fade_s)
        rub += (from_db(treble_db) - 1) * high_pass(rub, hz=4500, order=1)
        rub = from_db(1) * rub + from_db(-5.5) * resonate(rub, ring_hz, q=1.8)
        out[:, span] += high_pass(rub, low_cut_hz, order=2)
    return colour(out, latex_colour)


def scene():
    """Rubber, air and pump close by, over the quiet of the room."""
    rubber = rubber_rubs() + finger_slides() + balloon_hoots()
    pump = pump_air() + valve_ticks() + piston_seal() + piston_clacks()
    air = neck_pop() + escaping_air() + seeping_air() + air_column()
    close = rubber + pump + air
    snaps = rubber_snaps()
    bumps = balloon_bumps() + sofa_thuds()
    quiet = room_tone()
    echo = room_echo(from_db(-8) * close + from_db(-12) * snaps + from_db(-9) * bumps)
    return close + snaps + bumps + echo + cloth_rustle() + quiet


def record(dry, peak_limit=.8, cutoff_hz=14700):
    """Colour left and right differently, round off the highest peaks and cut the top treble."""
    # Balance of the two microphones: pitch_hz, left_minus_right_db
    balance = [(100, 0.5), (600, 1.5), (1400, 3.5), (2800, 2.5), (4200, 4.5), (5500, 1.5), (7000, 2.5),
               (8200, -4), (11800, -1), (14200, -12.5)]
    tilt = from_db(at_hz(balance) * [[.5], [-.5]])
    tilt /= np.sqrt(np.mean(tilt ** 2, axis=0))
    heard = irfft(rfft(dry, FFT_SIZE) * tilt)[:, :N]
    rounded = heard / (1 + (heard / peak_limit) ** 4) ** .25
    return signal.sosfilt(signal.ellip(10, .2, 80, cutoff_hz, fs=SR, output="sos"), rounded)


dry = scene()
out = record(dry)
dump(out)
```